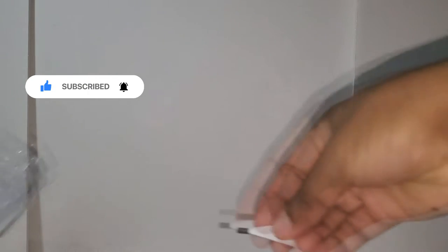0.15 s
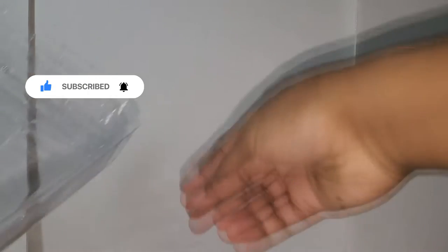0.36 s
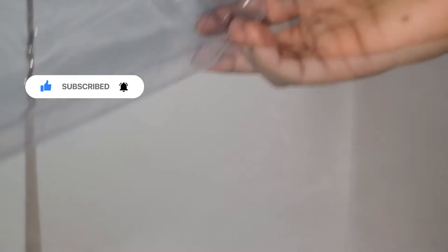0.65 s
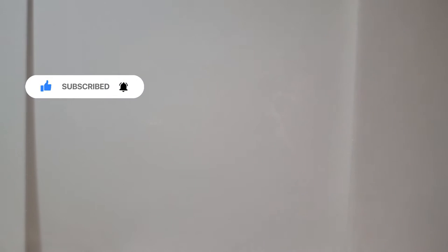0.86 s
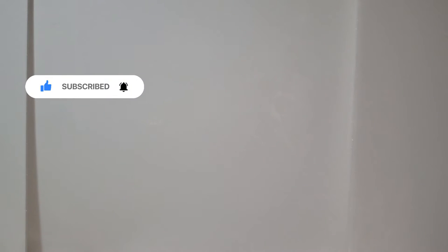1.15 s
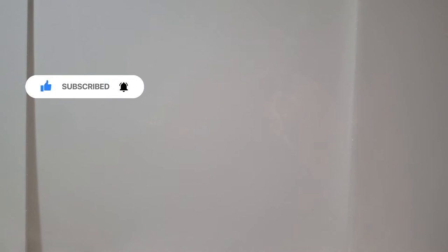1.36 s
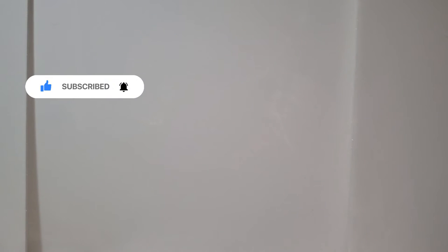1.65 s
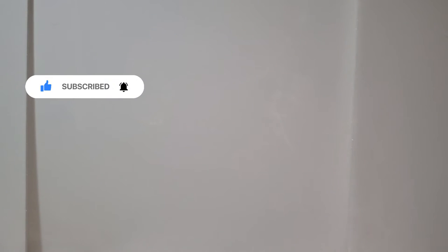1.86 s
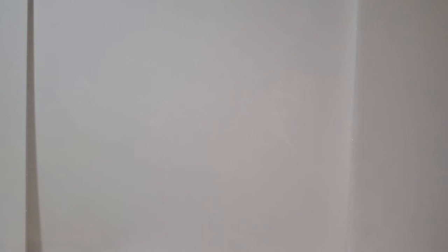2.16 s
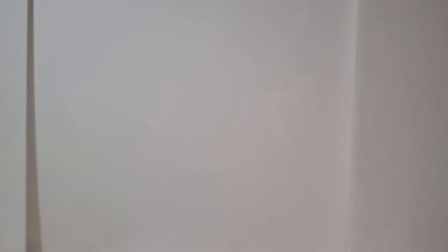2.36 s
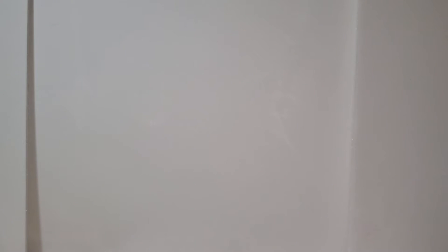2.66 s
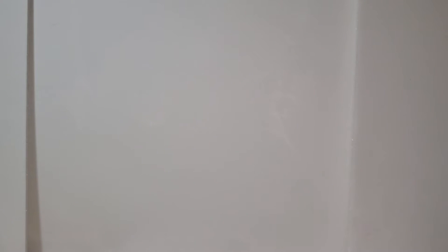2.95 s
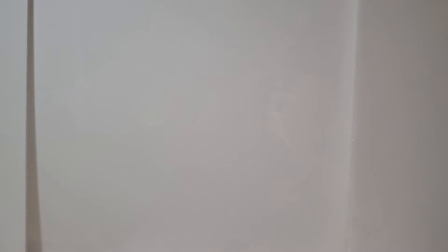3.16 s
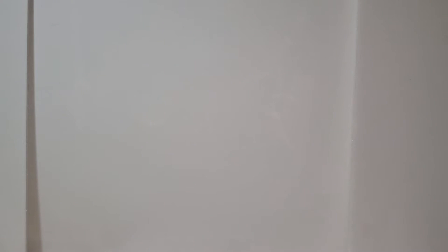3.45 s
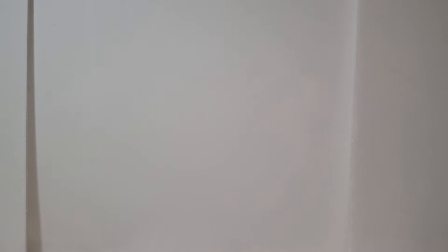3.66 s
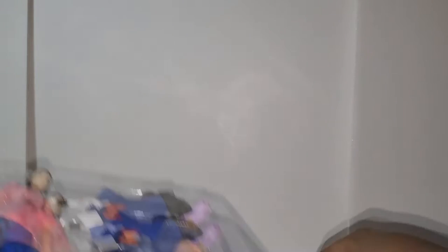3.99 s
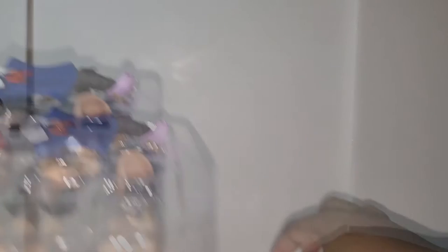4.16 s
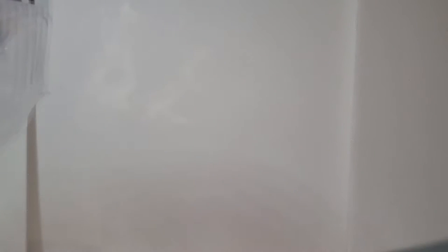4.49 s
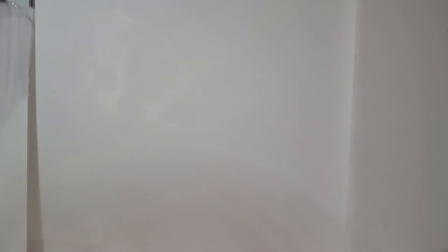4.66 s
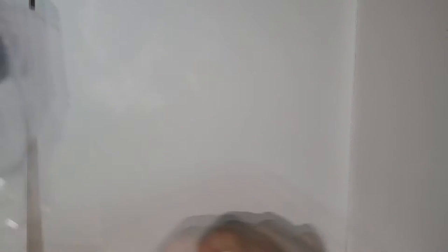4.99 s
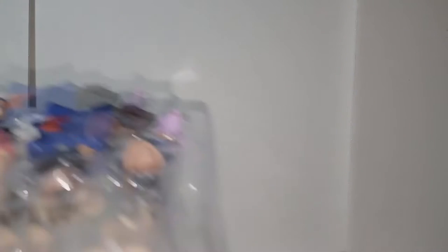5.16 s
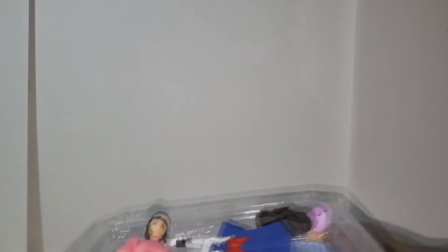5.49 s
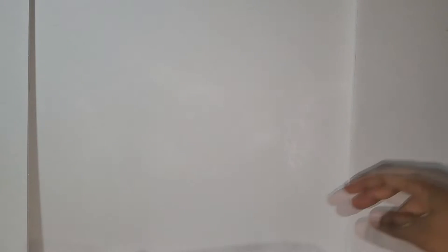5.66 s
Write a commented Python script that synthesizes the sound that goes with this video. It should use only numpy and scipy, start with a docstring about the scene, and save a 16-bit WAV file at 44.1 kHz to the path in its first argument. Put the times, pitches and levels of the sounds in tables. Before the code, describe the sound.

Hands work a stiff plastic tray out of its sleeve with sharp cracks, hollow crunches and a short sliding rasp.

```python
"""Sharp snaps and crinkles of stiff plastic: a blister tray pried open by hand, close up in a small room.
Creases flip with a crack and ring the sheet, squeezes set off crunches, and whole panels flex with a thump.
The tray rasps as it sticks and slips out of its sleeve, and a small hard piece clinks faintly.
Soft, airy swells of hiss with a low rub come between the crackles; mains hum and rumble lie underneath."""
import sys
import numpy as np
from scipy import signal
from scipy.fft import rfft, irfft, next_fast_len
from scipy.io import wavfile
from scipy.ndimage import uniform_filter1d, map_coordinates

SR = 44100
rng = np.random.default_rng(int(sys.argv[2]) if len(sys.argv) > 2 else 0)


def store_wav(level_fs):
    """Save 16-bit WAV to argv[1]."""
    pcm = np.round(np.clip(np.atleast_2d(level_fs), -1, 1) * 32767)
    wavfile.write(sys.argv[1], SR, pcm.T.astype(np.int16))


N = 257103
BODY_HZ, TICK_HZ, TOP_HZ = 1500, 6000, 16100  # body/crack crossover, crack/tick crossover, band limit


def snaps(body_t60=0.011, crack_t60=0.024, tick_t60=0.026, tail_t60=0.095):
    """A crease flips with a hard crack and rings its facet; bending waves die away in the tray."""
    # the loudest buckles: (time [s], relative crack [dB], relative body [dB], facet pitch [Hz])
    buckles = [(0.3872, -17, -14.5, 1134), (0.3891, -12, -9, 1450), (0.4217, -14, -18.5, 1190),
               (0.4322, -26, -21, 1120), (0.5806, -46, -47, 3100), (0.7862, -32, -38, 5500),
               (0.7998, -19.5, -29, 3530), (1.0209, -35.5, -26, 870), (1.0302, -29.5, -36, 914),
               (1.4574, -26.5, -29, 1270), (1.6103, -35, -34, 2760), (1.6312, -39.5, -41, 855),
               (1.688, -40, -53, 3600), (2.0369, -40.5, -30, 1470), (2.2111, -35, -57, 4660),
               (2.4586, -35, -49, 1506), (2.5088, -35.5, -44, 4470), (3.4867, -38, -43, 2840),
               (3.5471, -32, -38.5, 3300), (3.626, -27, -58, 2640), (3.6381, -29.5, -32.5, 6500),
               (3.711, -36, -53, 2670), (3.735, -42, -24, 885), (3.7452, -27.5, -20, 1050),
               (4.0104, -43.5, -51, 3800), (4.0763, -23.5, -26, 1040), (4.6136, -47.5, -50, 5300),
               (4.793, -51.5, -61, 5400), (5.1039, -36.5, -62, 3020), (5.1824, -33, -45, 3200),
               (5.2057, -29.5, -43, 3200), (5.2179, -24, -41, 3140), (5.2227, -28.5, -49, 3160),
               (5.2662, -31.5, -39, 3130), (5.4411, -30, -21, 1490), (5.537, -34, -25.5, 1540),
               (5.644, -34.5, -31.5, 1640), (5.6829, -32.5, -27, 1560), (5.7298, -36.5, -34, 3030),
               (5.7535, -29, -22.5, 788), (5.7875, -22.5, -29, 1940)]
    out, t = np.zeros((2, N)), np.arange(SR // 8) / SR
    decays = [(body_t60, -14), (crack_t60, -14), (tick_t60, -18)]  # (t60 [s], tail level [dB])
    envelopes = np.array([fade(t, t60) + amp(db) * fade(t, tail_t60) for t60, db in decays])
    for s, crack_db, body_db, hz in buckles:
        waves = envelopes[:, None] * stereo_noise(len(t))
        low, middle, high = coloured(waves, lambda f: crease_db(f) + hollow_db(f, hz))
        body = split(low, BODY_HZ)[0]
        crack = split(split(middle, BODY_HZ)[1], TICK_HZ)[0]
        tick = split(high, TICK_HZ)[1]
        tick_db = -13 + 0.6 * crack_db + grip_db(s)  # a big crease is duller: its treble grows less
        bands = [(body, body_db + 0.5), (crack, crack_db + 1.5), (tick, tick_db)]
        snap = sum(amp(db) * band / np.std(band[:, :SR // 200]) for band, db in bands)  # by first 5 ms
        snap += amp(-1) * facet_gain(hz, body_db, crack_db) * facet_ring(hz, t)
        add(out, s, snap)
        for delay, db in settling_ticks():
            add(out, s + delay, amp(db) * snap)
    return out


def facet_ring(hz, t, cycles=45):
    """A flipped facet rings in two modes for some dozens of cycles."""
    modes = [(hz, 0), (0.75 * hz, -6)]  # (pitch [Hz], level [dB])
    return sum(amp(db) * np.sin(2 * np.pi * f * t) * fade(t, cycles / f) for f, db in modes)


def facet_gain(hz, body_db, crack_db):
    """A large, low facet sounds with the body of the shell; a small, high one with the crack."""
    return amp(body_db if hz < BODY_HZ else crack_db)


def settling_ticks(within_s=0.09, level_db=-11, loss_db_per_s=190, count=3):
    """The sheet settles after a snap in a few ever weaker ticks: (delay [s], level [dB])."""
    return [(delay, level_db - loss_db_per_s * delay) for delay in within_s * rng.random(count)]


def crinkle(flex_db=6, flex_hz=240, grip_share=0.46, grip_hz=3500):
    """Under a squeeze, tiny creases set each other off in a hollow crunch; the bending panel adds bass."""
    # (crest time [s], swell time [s], relative body [dB], crackle level [dB], hollow pitch [Hz])
    crunches = [(0.402, 0.0046, -18, -24.5, 1170), (0.645, 0.021, -47, -63, 655),
                (0.747, 0.014, -40.5, -48, 665), (1.024, 0.0066, -34, -30, 1620),
                (1.476, 0.0168, -32.5, -32.5, 920), (1.721, 0.033, -45, -44, 960),
                (2.111, 0.033, -62, -40, 3380), (2.266, 0.0071, -39.5, -29, 2670),
                (2.29, 0.015, -31.5, -34.5, 373), (3.525, 0.017, -37, -35.5, 3370),
                (3.668, 0.033, -30, -30, 693), (3.752, 0.047, -32.5, -33, 1150),
                (4.045, 0.049, -48, -46.5, 1590), (4.676, 0.0095, -40, -45.5, 1240),
                (4.733, 0.022, -35.5, -50, 467), (4.777, 0.046, -47, -50.5, 622),
                (5.12, 0.048, -37.5, -42, 2000), (5.232, 0.01, -39, -28, 2660),
                (5.35, 0.06, -44.5, -44.5, 3030), (5.445, 0.027, -26.5, -27.5, 1310),
                (5.535, 0.026, -34, -33, 694), (5.764, 0.019, -23.5, -22, 776),
                (5.79, 0.029, -22.5, -27.5, 1160)]
    out, t = np.zeros((2, N)), np.arange(-SR // 4, SR // 4) / SR
    for s, swell, body_db, crackle_db, hz in crunches:
        # a quick collapse is a dense burst; a slow squeeze breaks up into single crackles
        creases = grains(len(t), per_s=2600, spread_db=min(2.8 + 55 * swell, 5), lag_s=0.0003)
        bass_db = lambda f: flex_db * np.exp(-(f / flex_hz) ** 2)
        treble_db = lambda f: grip_share * grip_db(s) * (1 - np.exp(-(f / grip_hz) ** 4))
        colour = lambda f: tray_db(f) + hollow_db(f, hz) + bass_db(f) + treble_db(f)
        low, high = split(coloured(creases, colour), BODY_HZ)
        crunch = amp(body_db - 1.5) * unit(low) + amp(crackle_db) * unit(high)
        pops = amp(-2) * facet_gain(hz, body_db, crackle_db) * patter(len(t), hz)
        envelope = np.exp(-np.abs(t) / (swell * np.where(t < 0, 0.92, 1)))  # slightly quicker in than out
        add(out, s + t[0], envelope * (crunch + pops))
    return out


def patter(length, hz, scatter_octaves=0.42, cycles=20, count=250):
    """Many small facets pop, each with its own short ring near a common pitch."""
    t = np.arange(SR // 40) / SR
    when, size, pan = rng.random((3, count, 1))
    pitch = np.minimum(hz * 2 ** (scatter_octaves * rng.standard_normal((count, 1))), TOP_HZ)
    pops = uneven(size, spread_db=3) * np.sin(2 * np.pi * pitch * t) * fade(t, cycles / pitch)
    at = ((when * length).astype(int) + np.arange(len(t))).ravel() % length
    return unit(np.array([np.bincount(at, (share * pops).ravel(), length) for share in (pan, 1 - pan)]))


def tray_db(hz, detune=0.02, vary_db=3):
    """The sheet's broad colour, with the tray's resonances detuned and reweighted for every hit."""
    # spectrum of the sheet: (frequency [Hz], level [dB])
    sheet = [(100, -20), (220, -4), (390, -6), (600, -9), (1100, -7), (4600, -9), (7300, -23),
             (9300, -21.5), (16000, -39)]
    # resonances of the tray: (centre [Hz], width [Hz], lift [dB])
    shell = [(565.6, 8.4, 9), (683, 150, 6.5), (804, 23, 5.5), (1885, 36.5, 3.5), (3980, 57, -2),
             (4550, 730, -3.5)]
    chance = rng.standard_normal((len(shell), 2))
    lifts = [(db + vary_db * louder) / (1 + (2 * (hz - centre * (1 + detune * higher)) / width) ** 2)
             for (centre, width, db), (higher, louder) in zip(shell, chance)]
    return along(sheet, hz) + sum(lifts)


def crease_db(hz, thin_db=12, thin_hz=540):
    """One small crease moves too little air to give much bass."""
    return tray_db(hz) - thin_db * np.exp(-(hz / thin_hz) ** 4)


def hollow_db(hz, centre_hz, lift_db=4, octaves=0.24):
    """The bent part of the tray favours a broad band around its own pitch."""
    return lift_db * np.exp(-(np.log2((hz + 1) / centre_hz) / octaves) ** 2)


def grip_db(s):
    """How freely the fingers let the sheet's treble ring at s seconds."""
    # successive grips: (start [s], treble lift [dB])
    grips = [(0.382, -7), (0.74, 1), (1.6, -2), (2.03, 3), (3.48, -2.5), (4.6, 3), (5.06, -6), (5.4, -14)]
    starts, treble = np.transpose(grips)
    return treble[max(np.searchsorted(starts, s, side="right") - 1, 0)]


def thumps(t60=0.1, attack_s=0.00111, upper_ratio=1.21):
    """A whole panel flexes and swings for a few low cycles in two close modes."""
    # panel flexes: (time [s], relative level [dB], pitch [Hz])
    flexes = [(0.807, -22.5, 191), (3.675, -21, 157), (3.744, -19.5, 233), (4.076, -17, 248),
              (4.397, -29.5, 245), (5.73, -19.5, 235), (5.753, -17, 152)]
    out, t = np.zeros(N), np.arange(SR // 4) / SR
    for s, db, hz in flexes:
        swing = np.sin(2 * np.pi * hz * t) + amp(-6) * np.sin(2 * np.pi * hz * upper_ratio * t)
        add(out, s, amp(db - 1) * swing * fade(t, t60) * (1 - np.exp(-t / attack_s)))
    return out


def scrape(flutter_db=1.4, judder_db_per_s=4, left_db=1.34):
    """Plastic sticks and slips along the sleeve in a dense rasp, juddering more as the tray comes free."""
    # the pull out of the sleeve: (time [s], effort [dB])
    pull = [(2.02, -63), (2.034, -33), (2.252, -36.5), (2.264, -28.5), (2.416, -39), (2.456, -29.5),
            (2.544, -35.5), (2.612, -31.5), (2.78, -75.5)]
    # spectrum of the sliding plastic: (frequency [Hz], level [dB])
    spectrum = [(50, -13), (110, 2.5), (250, 1), (700, -6.5), (1200, -8), (1800, -10), (3900, -14),
                (7300, -24), (9500, -23.5), (16000, -35.5)]
    slips = grains(N, per_s=4000, spread_db=4.3, lag_s=0.0008)
    friction = coloured(slips, lambda hz: along(spectrum, hz))
    low, high = split(shifting(friction, depth_db=1.9), BODY_HZ)  # the contact point travels
    judder_db = -5.5 + judder_db_per_s * (np.arange(N) / SR - 1.77)
    judder = amp(judder_db + flutter_db * wobble(60)) * unit(low)
    rasp = amp(-2 + flutter_db * wobble(60)) * unit(high)
    return fader(pull) * amp([[left_db], [-left_db]]) * (judder + rasp)


def airy_swells(rub_lag_s=0.039, rub_share=0.72):
    """Soft, airy hiss swells and fades between the crackles, with a lower rub cresting just after it."""
    # swells: (crest time [s], swell time [s], relative rub [dB], relative hiss [dB])
    swells = [(1.089, 0.1, -52.5, -49.5), (3.241, 0.17, -41.5, -51), (4.634, 0.16, -60, -54.5)]
    # spectrum of the airy noise: (frequency [Hz], level [dB])
    spectrum = [(2000, 0.5), (2900, 10), (6800, 1), (9500, 2), (16000, -8.5)]
    t = np.arange(N) / SR
    noise = coloured(rng.standard_normal((2, N)), lambda hz: along(spectrum, hz))
    low, high = split(shifting(noise, depth_db=-3.7), TICK_HZ)
    bell = lambda s, swell: (1 + ((t - s) / swell) ** 2 / 10) ** -10
    rub = sum(amp(db - 7) * bell(s + rub_lag_s, rub_share * swell) for s, swell, db, _ in swells)
    hiss = sum(amp(db - 2) * bell(s, swell) for s, swell, _, db in swells)
    tremble = amp(0.66 * wobble(21))
    return tremble * (rub * unit(low) + hiss * unit(high))


def shifting(x, depth_db):
    """Resonances come and go as a smooth random ripple moves over the spectrum."""
    spectra = signal.stft(x, nperseg=1024)[2]
    ripple = rng.standard_normal(spectra.shape[1:])
    for _ in range(2):
        ripple = uniform_filter1d(uniform_filter1d(ripple, size=5, axis=0), size=4, axis=1)
    return signal.istft(spectra * amp(depth_db * unit(ripple)), nperseg=1024)[1][:, :N]


def clinks(t60=0.066, attack_s=0.00088):
    """A small hard piece is nudged and rings faintly."""
    # light contacts: (time [s], relative level [dB])
    contacts = [(4.726, -41.5), (4.741, -33), (4.774, -47), (4.803, -48.5)]
    # modes of the piece: (pitch [Hz], relative level [dB])
    modes = [(3930, 7.5), (5350, -9)]
    out, t = np.zeros(N), np.arange(SR // 4) / SR
    for s, db in contacts:
        ring = sum(amp(level) * np.sin(2 * np.pi * (hz * t + rng.random())) for hz, level in modes)
        add(out, s, amp(db) * ring * fade(t, t60) * (1 - np.exp(-t / attack_s)))
    return out


def room(x):
    """The walls answer with a short tail that loses its treble first."""
    # reverb decay: (frequency [Hz], t60 [s])
    decay = [(200, 0.23), (2500, 0.21), (14000, 0.2)]
    hz, t, spectra = signal.stft(stereo_noise(SR // 2), SR, nperseg=256)
    tail = signal.istft(spectra * fade(t, along(decay, hz)[:, None]), SR, nperseg=256)[1]
    tail = np.pad(tail / np.linalg.norm(tail[0]), ((0, 0), (SR // 200, 0)))  # 5 ms pre-delay
    return signal.fftconvolve(x, tail, axes=1)[:, :N]


def background(rumble_db=-42):
    """A wavering mains hum sits over the low rumble of the room."""
    # mains partials: (pitch [Hz], relative level [dB])
    partials = [(59.2, -0.5), (118.4, -15)]
    # slow drift of the whole hum: (time [s], level [dB])
    drift = [(0, -43), (1.2, -38), (2.1, -37.5), (3.1, -46), (4.4, -37), (5.83, -37)]
    # spectrum of the rumble: (frequency [Hz], level [dB])
    room_tone = [(20, -20), (48, 4.5), (85, 3), (220, -5.5), (400, -18.5), (800, -29), (2000, -45),
                 (16000, -56.5)]
    t = np.arange(N) / SR
    hum = sum(amp(db + wobble(3.2)) * np.sin(2 * np.pi * (hz * t + rng.random())) for hz, db in partials)
    rumble = unit(coloured(stereo_noise(N), lambda hz: along(room_tone, hz)))
    return np.sqrt(2) * fader(drift) * hum + amp(rumble_db - wobble(2.877)) * rumble


def grains(length, per_s, spread_db, lag_s):
    """Tiny random slips of very unequal size, reaching left and right at different moments."""
    when, size, sign, lag = rng.random((int(per_s * length / SR), 4)).T
    push = np.sign(sign - 0.5) * uneven(size, spread_db)
    left = (when * length).astype(int)
    right = left + np.round(lag_s * SR * (2 * lag - 1)).astype(int)
    return unit(np.array([np.bincount(at % length, push, length) for at in (left, right)]))


def uneven(draw, spread_db):
    """Uniform draws become gains: many small, a few large."""
    return amp(-spread_db * np.log(np.maximum(draw, 0.02)))


def stereo_noise(length):
    """White noise, narrow in the bass and wide in the treble."""
    # left-right likeness: (frequency [Hz], correlation [0-1])
    likeness = [(100, 0.98), (900, 0.59), (2500, 0.05)]
    m = next_fast_len(length)
    angle = np.arccos(along(likeness, np.fft.rfftfreq(m, 1 / SR))) / 2
    spectra = rfft(rng.standard_normal((2, length)), m)
    mid, side = irfft(spectra * [np.cos(angle), np.sin(angle)], m)[:, :length]
    return np.array([mid + side, mid - side])


def coloured(x, level_db):
    """Minimum-phase EQ whose gain in dB is a function of frequency."""
    m = 2 * next_fast_len(x.shape[-1] // 2 + 2048)
    cepstrum = irfft(np.log(amp(level_db(np.fft.rfftfreq(m, 1 / SR)))))
    cepstrum[1:m // 2] *= 2
    cepstrum[m // 2 + 1:] = 0
    return irfft(rfft(x, m) * np.exp(rfft(cepstrum)))[..., :x.shape[-1]]


def split(x, hz):
    """Crossover: the parts of x below and above hz."""
    return [signal.sosfilt(signal.butter(3, hz, side, fs=SR, output="sos"), x) for side in ("low", "high")]


def fader(points):
    """A smoothed gain curve through (time [s], level [dB]) points, silent outside them."""
    times, levels = np.transpose(points)
    db = np.interp(np.arange(N) / SR, times, levels, left=-120, right=-120)
    return uniform_filter1d(amp(db), size=256)


def wobble(rate):
    """A smooth random curve, rate knots a second."""
    return map_coordinates(rng.standard_normal(int(N * rate / SR) + 4), [np.arange(N) * rate / SR])


def along(points, hz):
    """Read (frequency [Hz], value) points on a log axis."""
    frequencies, values = np.transpose(points)
    return np.interp(np.log(hz + 1), np.log(frequencies), values)


def fade(t, t60):
    """A decay that loses 60 dB in t60 seconds."""
    return np.exp(-np.log(1000) * t / t60)


def amp(db):
    """Decibels to gain."""
    return 10 ** (np.asarray(db) / 20)


def unit(x):
    """Scale to rms 1."""
    return x / np.sqrt(np.mean(x ** 2) + 1e-20)


def add(track, s, sound):
    """Mix a sound into the track at s seconds."""
    part = track[..., round(s * SR):][..., :sound.shape[-1]]
    part += sound[..., :part.shape[-1]]


def scene(room_db=-14):
    """The tray is handled close by, a little to the left, over the room tone."""
    # panning EQ: (frequency [Hz], gain added left and taken from the right [dB])
    pan = [(120, -0.3), (500, 1.46), (9000, 1)]
    close = snaps() + thumps() + clinks() + crinkle() + scrape() + airy_swells()
    placed = np.array([coloured(channel, lambda hz: side * along(pan, hz))
                       for channel, side in zip(close, (1, -1))])
    return placed + amp(room_db) * room(placed) + background()


def record(dry):
    """The phone overloads at full scale and keeps nothing above its band limit."""
    m = next_fast_len(N + SR // 2)
    passband = np.fft.rfftfreq(m, 1 / SR) < TOP_HZ
    return irfft(rfft(np.clip(dry, -1, 1), m) * passband, m)[:, :N]


dry = scene()
out = record(dry)
store_wav(out)
```